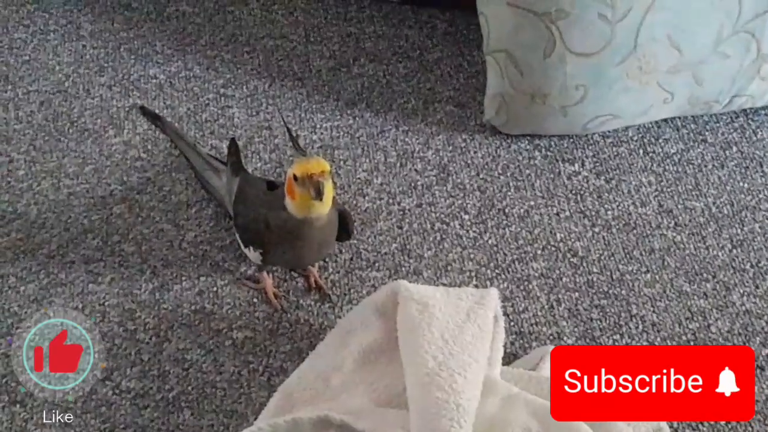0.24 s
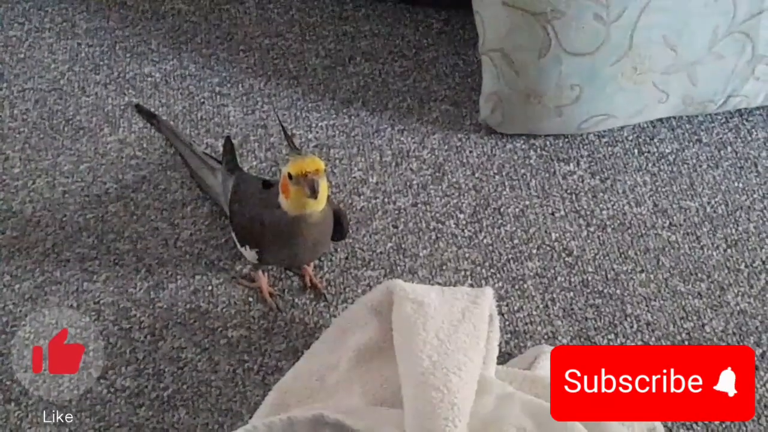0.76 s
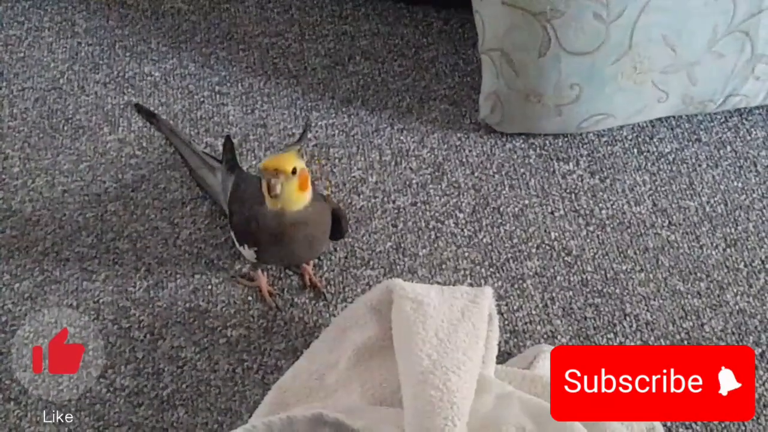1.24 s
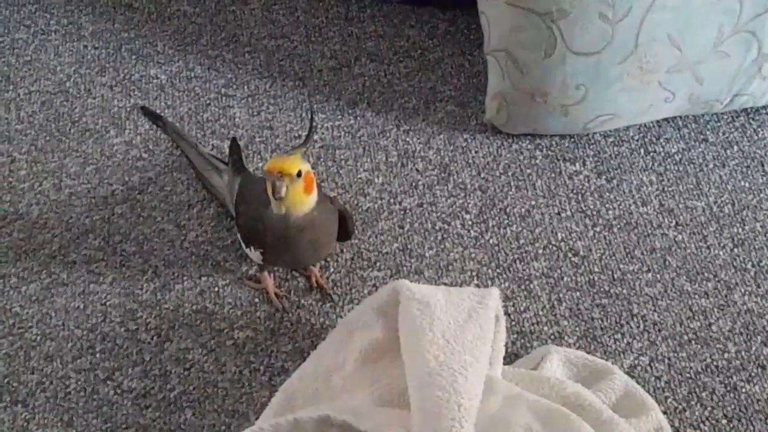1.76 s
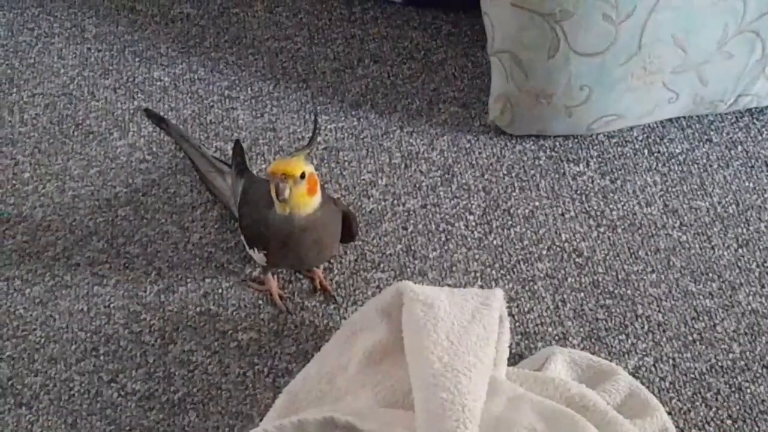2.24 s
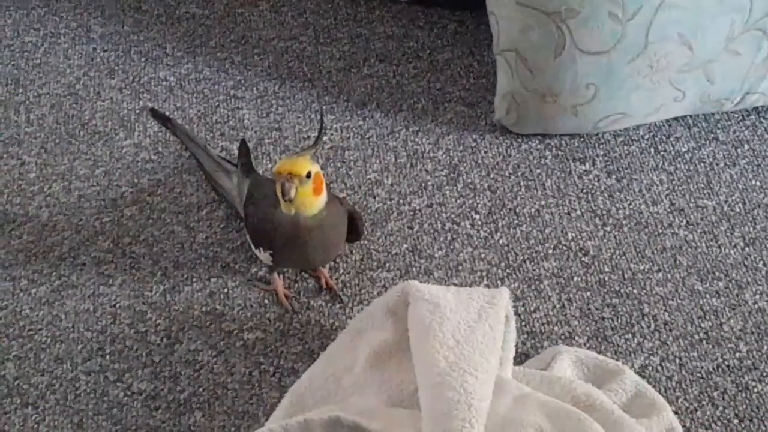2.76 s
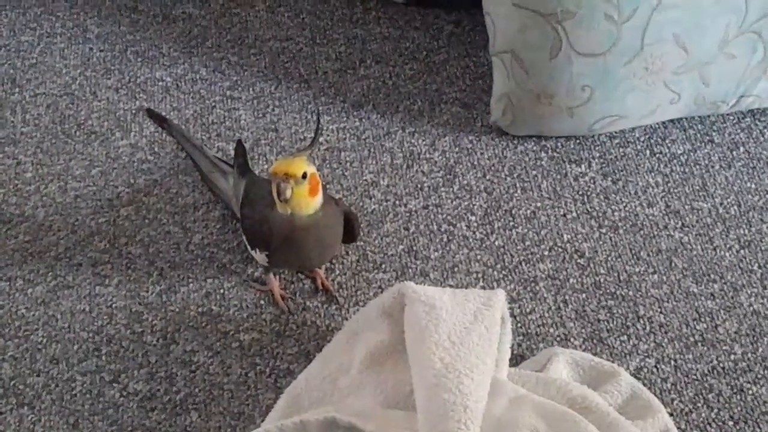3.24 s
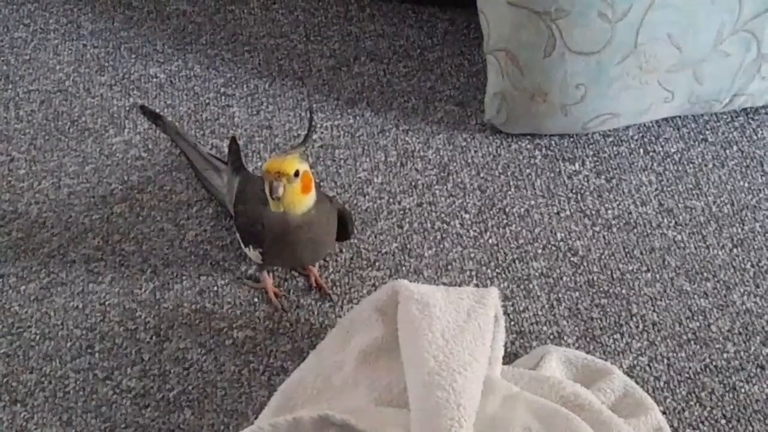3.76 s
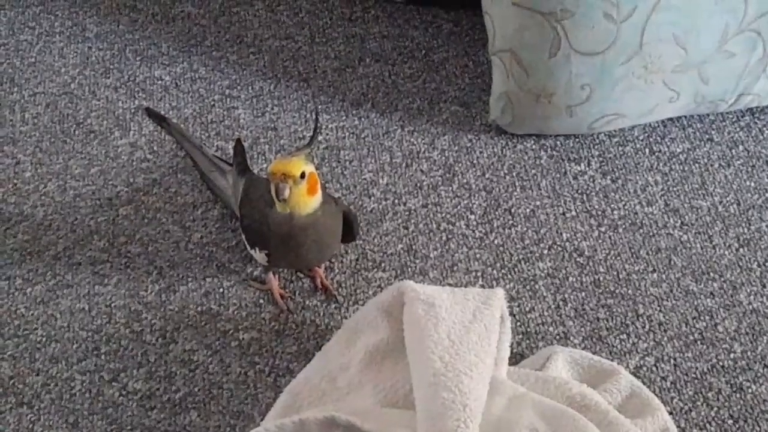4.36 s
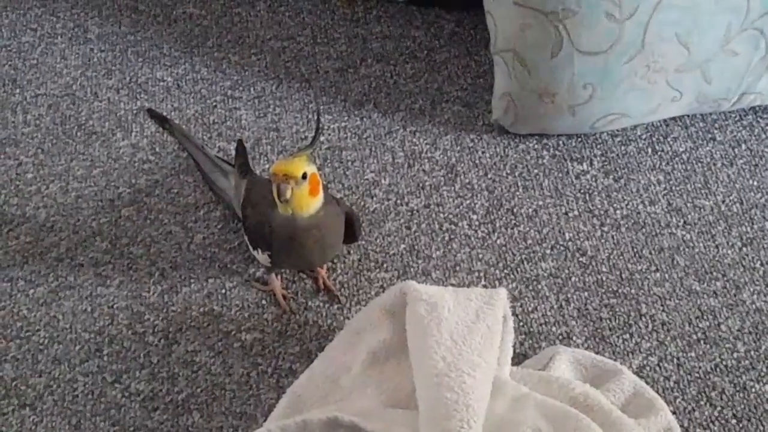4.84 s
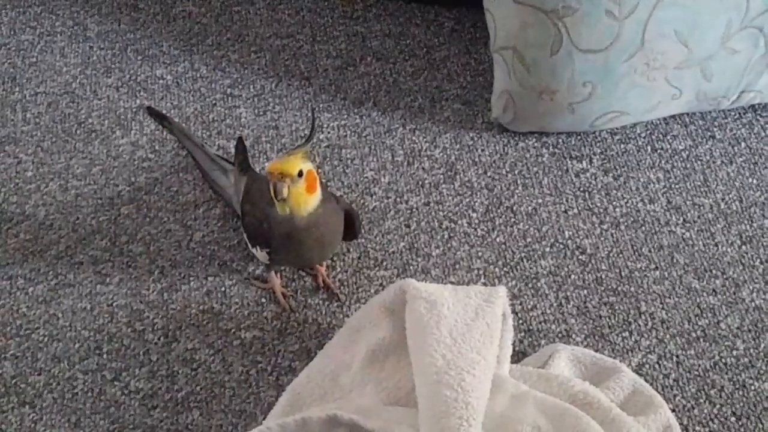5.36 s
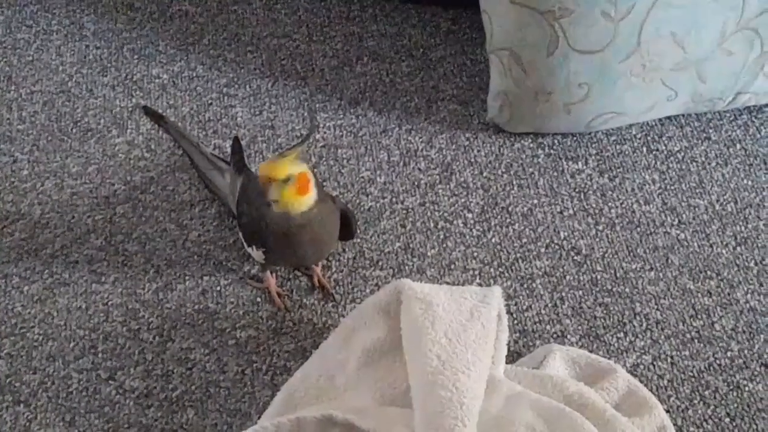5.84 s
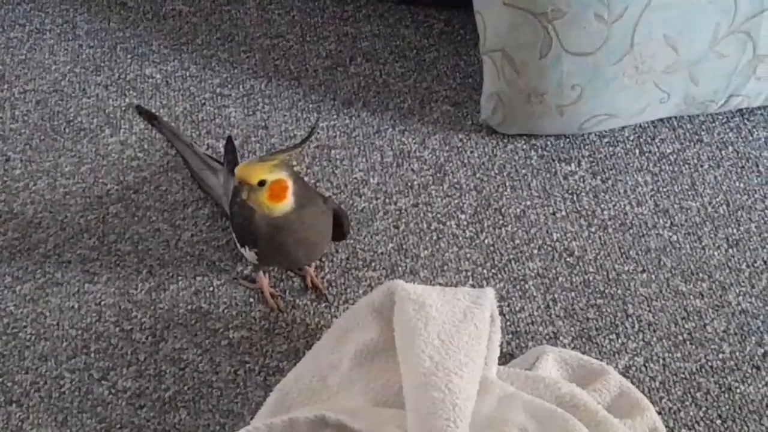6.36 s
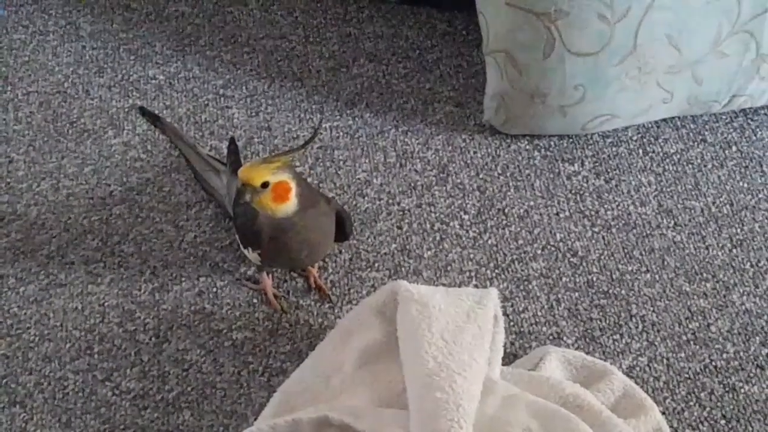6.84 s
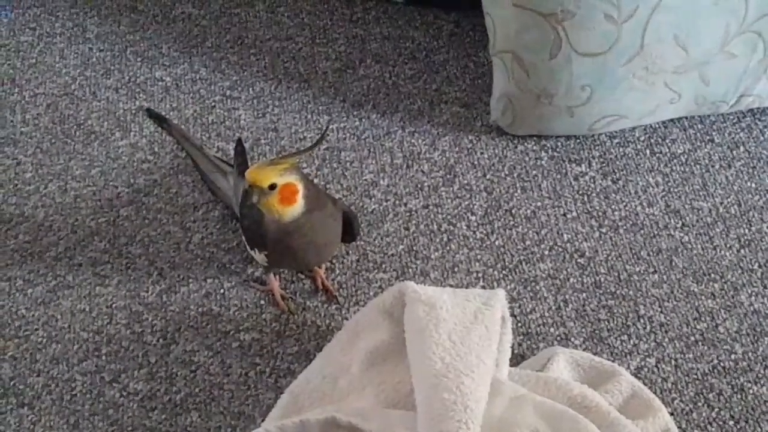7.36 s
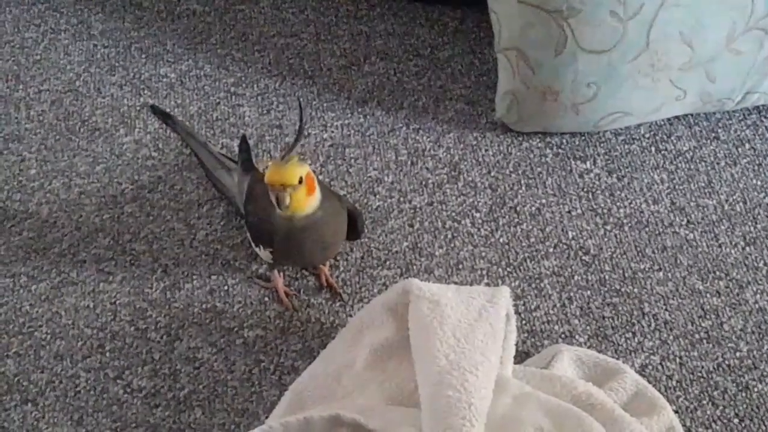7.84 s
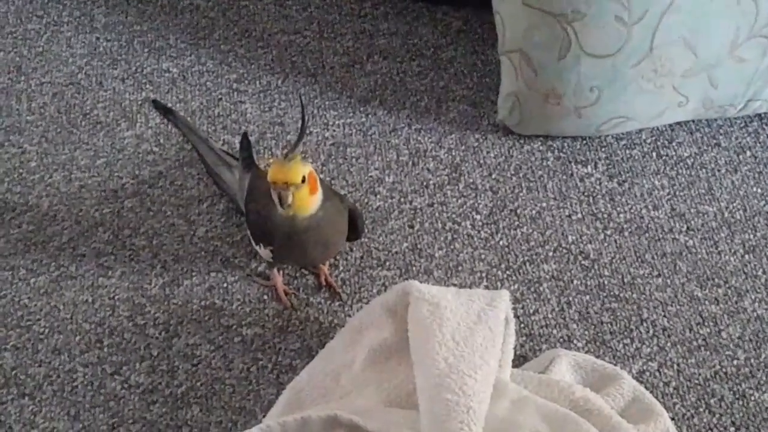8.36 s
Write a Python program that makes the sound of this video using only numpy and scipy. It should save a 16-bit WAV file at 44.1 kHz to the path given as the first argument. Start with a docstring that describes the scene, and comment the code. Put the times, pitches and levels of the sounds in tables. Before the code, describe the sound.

A small, quiet furnished room with very faint low rumble and appliance hum, heard by a nearby stereo phone. Dull handling bumps open the clip as a cockatiel begins at once: short bright whistles of about 0.06 seconds, peaking near 2.4 kHz and diving about an octave, four to five per second. Dry ticks fall around 0.4 to 0.5, 0.95 to 1.15 and 1.4 seconds, with a soft bump at 0.8 and a feathery rustle from 1.4 to 1.9. From 1.9 a second bird, right of centre and much quieter, mutters low arched notes until about 4.5. Chirps thin slightly after 3.5, with irregular gaps and a small bump at 4.5. Mutters return from 6.2, some hoarse, especially near 7.0 and 7.6. Faint bumps occur at 6.8 and 7.6 to 7.8. Chirping pauses after 7.45, then two final chirps sound at 8.2 and 8.4, each ringing briefly.

```python
"""From the start a cockatiel sings a run of short chirps, each a bright whistle that arches and then dives.
A few light ticks fall among the early chirps, and dull bumps and faint rustles come now and then.
From about two seconds on, a second bird to the right mutters soft low notes between and under the chirps.
Chirps and mutters are stacks of harmonics, shaped by throat or beak; the small room rings briefly after them.
Filtered noise makes a faint steady rumble, and wavering sine waves make a hum."""
import sys
import numpy as np
from scipy import signal
from scipy.fft import rfft, irfft, next_fast_len
from scipy.io import wavfile
from scipy.ndimage import map_coordinates

SR = 44100
rng = np.random.default_rng(int(sys.argv[2]) if len(sys.argv) > 2 else 0)


def wrap_up_sound(samples):
    """Save the sound to the file named by the first command line argument, as 16-bit audio."""
    columns = np.atleast_2d(samples).T
    # keep every value between -1 and 1, then stretch to whole-number steps
    tamed = np.clip(columns, -1, 1)
    steps = np.round(tamed * 32767).astype(np.int16)
    wavfile.write(sys.argv[1], SR, steps)


N = 379260

# share of the top pitch that a chirp has lost by its end
DIVE = 0.485


def amp(db):
    """Turn decibels into a gain."""
    return 10 ** (np.asarray(db) / 20)


def unit(x):
    """Scale x to an average (rms) level of 1."""
    return x / np.sqrt(np.mean(x ** 2) + 1e-20)


def along(points, hz):
    """Read a curve of (Hz, value) points at any frequency, on a log axis."""
    f, v = np.transpose(points)
    return np.interp(np.log(hz + 1), np.log(f + 1), v)


def at(curve, s):
    """Read all columns of a curve at time s."""
    times, *columns = np.transpose(curve)
    return [np.interp(s, times, c) for c in columns]


def wobble(rate, size):
    """Draw a smooth random curve with so many random points (rate) a second."""
    return map_coordinates(rng.standard_normal(512), [np.arange(size) * rate / SR], mode="wrap")


def filtered(x, response):
    """Filter x by multiplying its spectrum by a response to frequency."""
    m = next_fast_len(N + SR // 2)
    spectrum = rfft(x, m) * response(np.fft.rfftfreq(m, 1 / SR))
    return irfft(spectrum, m)[..., :N]


def add(track, s, sound):
    """Mix a sound into a track from time s on."""
    start = max(0, round(s * SR))
    part = sound[..., :N - start]
    track[..., start:start + part.shape[-1]] += part


def colored_noise(points, draw, size):
    """Noise coloured by a curve of (Hz, dB): draw random samples, keep the first size of them, at rms 1."""
    spectrum = rfft(rng.standard_normal(draw)) * amp(along(points, np.fft.rfftfreq(draw, 1 / SR)))
    return unit(irfft(spectrum)[:size])


def background(rumble_db=-77.0):
    """Quiet room rumble whose low part swells, and the wavering hum of an appliance, stronger on the right."""
    # Colour of the rumble. Each row: frequency in Hz, relative level in dB per Hz.
    rumble_color = [(15, -31.5), (25, -6), (75, -8), (193, -3.5), (313, -9), (631, -19), (782, -21.5),
                    (895, -24), (1490, -25), (2550, -23.5), (5730, -32), (7700, -34), (13500, -25.5),
                    (15500, -31.5)]
    # Tones of the hum. Each row: frequency in Hz, level in dB, both before they waver and are panned.
    hum_tones = [(191, -81.5), (250, -86.5), (112, -90.5), (59.6, -87), (79.4, -91.5)]
    # one noise shared by both sides, plus some of their own
    noise = rng.standard_normal(N) + .75 * rng.standard_normal((2, N))
    steady = unit(filtered(noise, lambda hz: amp(along(rumble_color, hz))))
    low = filtered(steady, lambda hz: 1 / (1 + (hz / 400) ** 2))
    swell_db = 1.5 * wobble(3, N) + 1.5 * wobble(14, N)
    rumble = amp(rumble_db) * (steady - low + low * amp(swell_db))
    hum = np.zeros(N)
    for hz, db in hum_tones:
        level = amp(db + 3.7 * wobble(6.6, N))
        hum += level * np.sin(2 * np.pi * np.cumsum(hz + 2 * wobble(30, N)) / SR)
    return (rumble + hum) * amp([[-2], [2]])


def rustles():
    """Soft swells of airy hiss, as of feathers brushing: filtered noise that rises and fades."""
    # Each row: start in seconds, length in seconds, level in dB at the middle before it flutters.
    rustle_list = [(1.402, 0.47, -62.5), (4.187, 0.31, -78.5)]
    swell = np.zeros(N)
    for s, length, db in rustle_list:
        add(swell, s, amp(db) * np.hanning(int(length * SR)))
    airy = [(1000, -16), (4000, -7.0), (6000, -13.0), (8000, -5), (10500, -6.5), (13500, -3.5), (15000, -22.5)]
    hiss = unit(filtered(rng.standard_normal((2, N)), lambda hz: amp(along(airy, hz))))
    return hiss * swell * amp(2 * wobble(40, N))


def bumps(t60=0.11):
    """Dull little knocks and shuffles close to the phone: noise that dies by 60 dB in t60 seconds."""
    # Each row: start in seconds, level in dB before the noise is dulled and panned.
    bump_list = [(.012, -39), (.035, -44.5), (.795, -46.5), (4.512, -47), (6.802, -48), (7.572, -60),
                 (7.755, -59)]
    out, t = np.zeros(N), np.arange(SR // 8) / SR
    for s, db in bump_list:
        onset = np.minimum(t / 0.0025, 1)
        add(out, s, amp(db - 60 * t / t60) * onset * rng.standard_normal(len(t)))
    dull = [(150, -13), (330, -6.5), (520, 10), (750, -3), (2000, -8.0), (8000, -35)]
    return filtered(out, lambda hz: amp(along(dull, hz))) * amp([[-2], [2]])


def room(x, early_db, late_db, walls=None, early_t60=0.067, gap=0.0076):
    """Dense reflections from nearby furniture, then the longer ring of the walls, unrelated left and right."""
    # How long the walls ring. Each row: frequency in Hz, time to fall by 60 dB in seconds.
    ring_time = [(300, 0.19), (1500, 0.24), (2000, 0.26), (2350, 0.24), (3200, 0.22), (4700, 0.24),
                 (9000, .21), (14000, 0.18)]
    paths = rng.standard_normal((2, SR // 2))
    if walls is not None:  # a bird that stays in place keeps half of its echo paths
        paths = paths + walls
    # each pitch in the late ring dies at its own pace
    hz, t, z = signal.stft(paths, SR, nperseg=256)
    fade = amp(-60 * t / along(ring_time, hz)[:, None])
    late = signal.istft(z * fade, SR, nperseg=256)[1]
    t = np.arange(late.shape[1]) / SR
    early = rng.standard_normal(late.shape) * amp(-60 * t / early_t60)
    answer = (amp(early_db) * unit(early) + amp(late_db) * unit(late)) / np.sqrt(len(t))
    answer = answer * np.clip(t / gap - 1, 0, 1)  # the first echoes need time to come back
    return signal.fftconvolve(x[None], answer, axes=1)


def ticks(t60=0.027):
    """Dry little clicks of a beak or claw: bright noise that dies by 60 dB in t60 seconds."""
    # Each row: start in seconds, level in dB, from which each click is turned down by the same 13 dB.
    tick_list = [(0.401, -48.5), (0.484, -41.5), (0.946, -38.5), (0.96, -34), (1.002, -35), (1.146, -52),
                 (1.411, -37.5)]
    out, t = np.zeros((2, N)), np.arange(SR // 40) / SR
    for s, db in tick_list:
        bright = np.diff(rng.standard_normal(len(t) + 1))
        click = amp(db - 13.0 - 60 * t / t60) * bright
        add(out, s, click * amp([[0], [-4]]))
        add(out, s, room(click, early_db=-27.0, late_db=-17))
    return out


def mutterer(jitter=.09, flutter_db=3, rasp_hz=650, hiss_db=-2):
    """Soft arched notes from the right; a hoarse one smears each harmonic into a band of noise."""
    # Each row: start in seconds, length in seconds, top pitch in Hz before it jitters,
    # place of the crest (0-1), level in dB before beak, flutter and panning, hoarseness (0-1).
    mutter_list = [(1.902, 0.056, 870, 0.03, -53.5, 0.26), (2.034, 0.058, 535, 0.58, -61, 0.08),
                   (2.221, 0.055, 480, 0.75, -66, .35), (2.407, 0.062, 1200, .42, -53, 0),
                   (2.595, 0.049, 1108, 0.47, -58, .1), (2.76, 0.053, 1127, 0.26, -52.5, 0.25),
                   (2.938, 0.064, 1009, 0.47, -60, 0.08), (3.125, 0.045, 1010, 0.44, -64, 0.08),
                   (3.281, 0.078, 1218, 0.5, -61, 0), (3.812, 0.099, 840, 0.53, -51.5, 0.21),
                   (4.037, 0.066, 865, 0.79, -55, 0.2), (4.251, 0.074, 1057, .75, -54.5, 0.35),
                   (4.305, 0.043, 815, 0.1, -68, 0.18), (4.457, 0.054, 573, .6, -70, .15),
                   (6.24, 0.081, 1213, 0.39, -70, 0.11), (6.429, 0.11, 1413, .5, -64, 0.22),
                   (6.8, .09, 1102, .55, -64, 0.1), (7.016, 0.11, 1817, .45, -52, 0.58),
                   (7.225, .11, 1032, .5, -55, 0.28), (7.252, 0.063, 1308, 0.42, -55.5, 0.14),
                   (7.614, 0.084, 1284, .55, -53, 0.49), (7.819, 0.081, 774, 0.56, -60, 0.17),
                   (7.826, 0.066, 1060, 0.4, -63.5, 0), (8.125, .11, 1264, 0.42, -54.5, 0.15),
                   (8.44, .11, 834, 0.46, -59, 0.23)]
    # Colour of the hiss. Each row: frequency in Hz, relative level in dB per Hz.
    hiss_color = [(9000, -24), (11500, -8), (12800, 0.5), (14200, -6.5), (15200, -30)]
    beak = [(500, -5.5), (2500, 6.5), (3400, -9), (4800, -19.0), (6500, -32.0)]
    arch_s = .075  # the pitch is a bell around its crest, down to 1/e this far from it
    mellow_fall_db, hoarse_opens = 14.5, 5.1  # fall per harmonic of a clean note; hoarseness flattens it
    out = np.zeros((2, N))
    k = np.arange(1, 6)[:, None]  # harmonic numbers
    for s, length, top_hz, crest, db, hoarse in mutter_list:
        u = np.linspace(0, 1, int(length * SR))
        bell = np.exp(-((u - crest) * length / arch_s) ** 2)
        hz = top_hz * bell * (1 + jitter * hoarse ** 2 * wobble(300, len(u)))
        fall_db = mellow_fall_db * np.exp(-hoarse_opens * hoarse)
        harmonic_db = along(beak, k * hz) - fall_db * (k - 1)
        # random changes in level and phase roughen each harmonic
        rasp = np.array([wobble(rasp_hz, len(u)) + 1j * wobble(rasp_hz, len(u)) for _ in k])
        roughness = 1 - hoarse ** 2 + 1.3 * hoarse * rasp
        partials = np.real(roughness * np.exp(2j * np.pi * k * np.cumsum(hz) / SR))
        voice = (amp(harmonic_db) * partials).sum(axis=0)
        # a hoarse note also hisses high up
        voice = voice + amp(hiss_db) * hoarse ** 2 * colored_noise(hiss_color, SR // 4, len(u))
        swell = np.abs(np.sin(np.pi * u)) ** 1.1
        voice = voice * swell * amp(db + flutter_db * wobble(148.4, len(u)))
        add(out, s, voice * amp([[0], [7]]))
        add(out, s, room(voice, early_db=1.5, late_db=-7.5))
    return out


def arch(u):
    """Share of the top pitch as u runs from 0 to 1: a small scoop up to the crest, then an ever steeper dive."""
    crest, scoop_depth, dive_curve = .27, .065, 1.85  # place of the crest, pitch lacking at the start, bend
    scoop = np.clip(1 - u / crest, 0, 1)
    dive = np.clip((u - crest) / (1 - crest), 0, 1)
    return 1 - scoop_depth * scoop ** 2 - DIVE * dive ** dive_curve


def chirp(length, top_hz, db, middle_db, upper_db, turn_db,
          jitter=0.0081, flutter_db=3, scatter_db=3.0, rasp_db=-36, second_db=-1):
    """One whistle of the syrinx; its harmonics sweep through the resonances of the throat."""
    # What throat and beak let through. Each row: frequency in Hz, gain in dB.
    throat = [(1100, -27), (1400, -9), (1650, -0.5), (2400, 1.5), (3300, 11.5), (4000, -10), (4750, -3),
              (5400, -15.5), (6300, -13), (7150, -7), (8200, -35.5), (9100, -4.5), (10600, 0), (13700, 1),
              (14500, -3.5), (15300, -44)]
    # Air rasping through the open beak. Each row: frequency in Hz, relative level in dB per Hz.
    rasp_color = [(1200, -18), (2800, -4), (3500, -2), (4700, 1), (5400, -11.5), (7100, -3), (8200, -18),
                  (9500, -5), (14000, -15), (15300, -26)]
    # How strongly a head turn acts on an overtone. Each row: frequency in Hz, factor.
    beam = [(2600, -0.011), (3300, -1.4), (4000, -0.015), (4700, -0.47),
            (7000, 0.28), (9500, -1.1), (11500, -1.9), (13700, -0.51)]
    crown = 0.98  # the crest stays just under the top pitch
    attack_s, attack_curve, release_s = 0.02, 0.77, .003  # it swells, holds and stops short
    slack_from, slack_db = 0.13, -6.5  # drop in pitch (share) where it starts to weaken, full loss
    upper_slack_db, third_slack_db = -40.5, -21  # further loss of the upper harmonics and of the 3rd
    usual_hz, top_fall_db = 2400, -1.5  # the fall is per harmonic above the 6th
    middle_push_db, upper_push_db = 0.5, 2.5  # gain per 100 Hz of extra pitch

    u = np.linspace(0, 1, int(length * SR))
    pitch = arch(u)
    # deep in the dive the note loses strength, its upper harmonics first
    slack = np.clip((1 - pitch - slack_from) / (DIVE - slack_from), 0, 1)
    attack = np.minimum(u * length / attack_s, 1) ** attack_curve
    swell = attack * np.minimum((1 - u) * length / release_s, 1)
    # a note pitched higher is pushed harder, so it is brighter
    push = (top_hz - usual_hz) / 100
    k = np.arange(1, 9)[:, None]  # harmonic numbers
    middle_db = middle_db + middle_push_db * push + third_slack_db * slack * (k == 3) + second_db * (k == 2)
    upper_db = upper_db + upper_push_db * push + upper_slack_db * slack + top_fall_db * np.maximum(k - 6, 0)
    source_db = np.where(k == 1, 0, np.where(k < 4, middle_db, upper_db))
    # the pitch grows unsteady as the note dives
    hz = top_hz * crown * pitch * (1 + jitter * (.5 + 1.8 * u ** 2) * wobble(900, len(u)))
    # the beak beams each overtone in its own direction
    source_db = source_db + turn_db * along(beam, k * hz)
    # every overtone trembles on its own, in level and in phase
    tremble = np.array([flutter_db * wobble(400, len(u)) + scatter_db * rng.standard_normal() for _ in k])
    waver = .3 * np.array([wobble(600, len(u)) for _ in k])
    phase = k * 2 * np.pi * np.cumsum(hz) / SR + (k > 1) * waver
    harmonic_db = source_db + (k > 1) * tremble + along(throat, k * hz)
    tone = (amp(harmonic_db) * np.sin(phase)).sum(axis=0)
    rasp = colored_noise(rasp_color, SR // 10, len(u))
    return amp(db + slack_db * slack) * swell * (tone + amp(rasp_db) * rasp)


def cockatiel():
    """The song reaches the left port first; the head moves, so each chirp stirs the room a bit differently."""
    # Each row: start in seconds, length in seconds, top pitch in Hz (the crest stays just under it).
    chirp_list = [(0.02, .061, 2531), (0.265, .061, 2501), (0.482, .056, 2386), (.72, .067, 2391),
                  (.958, .061, 2443), (1.182, .058, 2387), (1.411, .062, 2417), (1.626, .056, 2428),
                  (1.811, .061, 2430), (2.002, .058, 2449), (2.208, .058, 2482), (2.387, .059, 2444),
                  (2.565, .061, 2404), (2.754, .061, 2436), (2.938, .058, 2348), (3.148, .058, 2403),
                  (3.327, 0.059, 2331), (3.543, .053, 2510), (3.836, .052, 2362), (4.039, .053, 2379),
                  (4.541, .05, 2290), (4.821, .051, 2386), (4.988, 0.05, 2370), (5.229, 0.055, 2325),
                  (5.4, .058, 2482), (5.662, .064, 2439), (6.037, .064, 2408), (6.287, .059, 2344),
                  (6.725, .058, 2349), (7.004, .061, 2373), (7.16, .056, 2432), (7.393, .064, 2398),
                  (8.17, .061, 2398), (8.428, .051, 2362)]
    # Strength of the overtones at the usual pitch, before throat and beak.
    # Each row: time in seconds, 2nd and 3rd harmonics in dB, upper harmonics in dB.
    overtone_levels = [(.48, -21.5, -16), (.72, -18.5, -15), (1.2, -17, -18), (2.2, -16, -14),
                       (3.5, -21.5, -14.5), (4.04, -21, -16.5), (4.6, -20.5, -13.5), (5.7, -22, -11),
                       (6.04, -22.5, -13), (7.4, -23, -8), (8.2, -16, -11.5)]
    # The turn of the head shifts the balance of the overtones.
    # Each row: time in seconds, size of the shift in dB before each overtone's own factor.
    head_turn = [(0, -2), (2.2, 2.5), (2.701, 5.5), (4.3, 2.5), (5.7, 6.5), (6.0, 5.5), (7.499, 11),
                 (8.5, 7)]
    # Single echoes off nearby surfaces, before the spill into the room colours them.
    # Each row: delay in seconds (it varies a little), left level in dB, right level in dB.
    echo_list = [(.0092, -16.5, -14.5), (0.0176, -18, -18.5)]
    # Timing between the two microphone ports. Each row: frequency in Hz, lead of the left in radians.
    left_lead = [(1000, 0), (1400, 1.8), (1800, 3.4), (2100, 4.5), (2450, 5.6), (3800, 8.6), (4900, 8.3),
                 (6000, 9.5), (9000, 12.7), (12400, 13.1), (14300, 15.3)]
    # Balance between the ports. Each row: frequency in Hz, left over right in dB.
    left_over_right = [(1200, 6.5), (1700, -2.5), (2150, 5), (2450, 5.5), (4700, 6.5), (7100, -0.5),
                       (9500, 12.5), (11500, 16), (14000, 2.5)]
    # Sound sent into the room rather than straight ahead, after carpet and cushions.
    # Each row: frequency in Hz, gain in dB.
    spill = [(1500, 3.5), (2050, -1), (2400, 4.5), (3300, -1.5), (4000, 1.5), (4700, 5.5), (5500, 1),
             (7000, 0.5), (9500, -4), (14000, -2.5)]
    chirp_db, wait_db_per_s = -17.5, -7  # chirps in quick succession are the loudest

    direct, echoes = np.zeros(N), np.zeros((2, N))
    walls = rng.standard_normal((2, SR // 2))
    waits = np.diff([s for s, *_ in chirp_list])
    for (s, length, top_hz), wait in zip(chirp_list, np.r_[waits[0], waits]):
        level_db = chirp_db + wait_db_per_s * wait
        sound = chirp(length, top_hz, level_db, *at(overtone_levels, s), *at(head_turn, s))
        add(direct, s, sound)
        add(echoes, s, room(sound, early_db=-6.0, late_db=-9.5, walls=walls))
        # late copies beat against the diving whistle
        for delay, *port_db in echo_list:
            for port, db in zip(echoes, port_db):
                add(port, s + delay + rng.normal(0, .0004), amp(db) * sound)
    right = filtered(direct, lambda hz: amp(-along(left_over_right, hz)) * np.exp(-1j * along(left_lead, hz)))
    spilled = filtered(echoes, lambda hz: amp(along(spill, hz)))
    # the right port faces the open room
    return np.array([direct, right]) + amp([[-1], [1.5]]) * spilled


def scene():
    """Both birds in the quiet room."""
    return background() + rustles() + bumps() + ticks() + mutterer() + cockatiel()


def record(dry):
    """The phone drops the deepest bass and keeps nothing above its band limit."""
    top_hz = 15700
    return filtered(dry, lambda hz: (hz < top_hz) * amp(along([(20, -16.5), (45, 0)], hz)))


dry = scene()
out = record(dry)
wrap_up_sound(out)
```